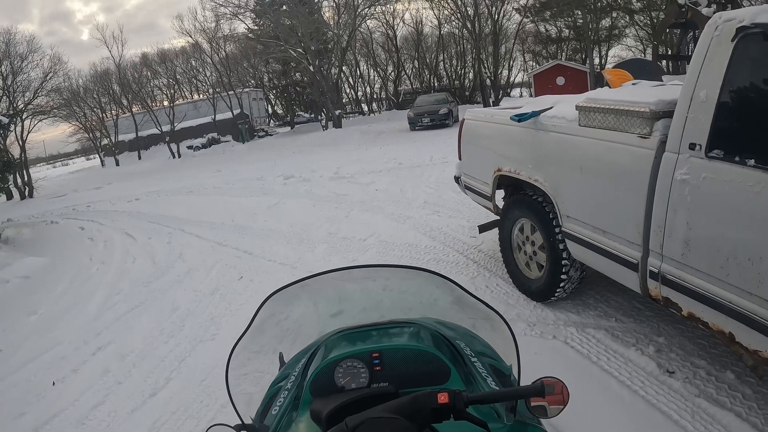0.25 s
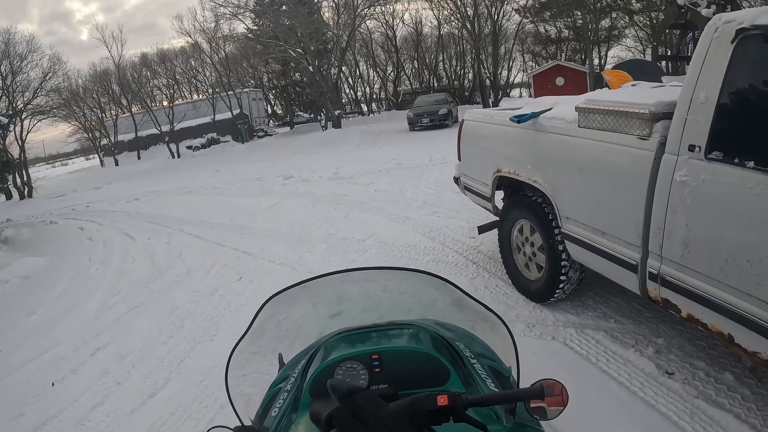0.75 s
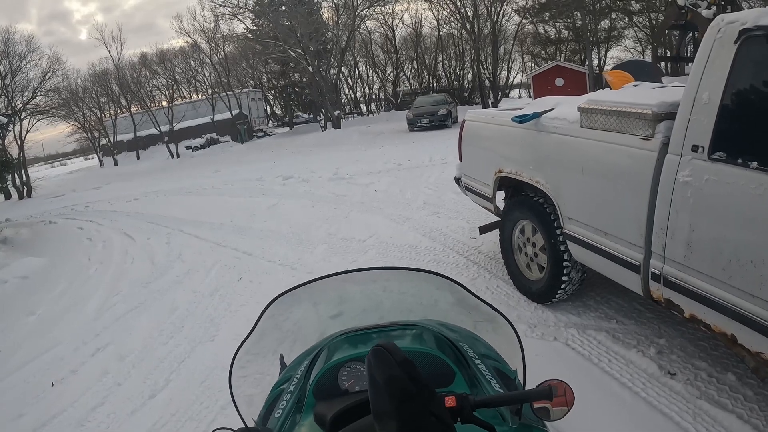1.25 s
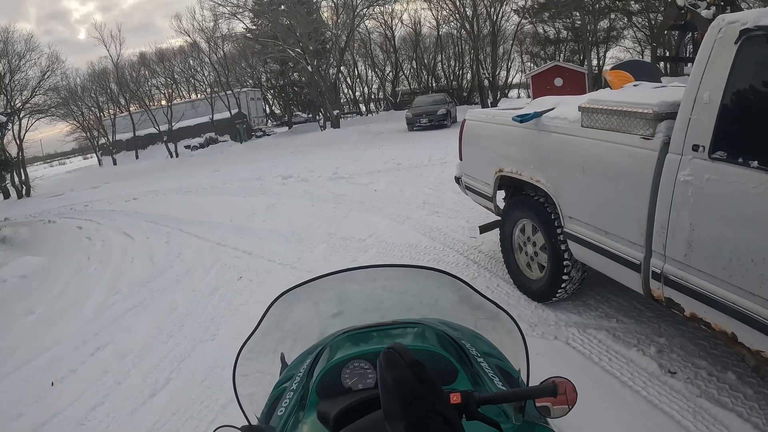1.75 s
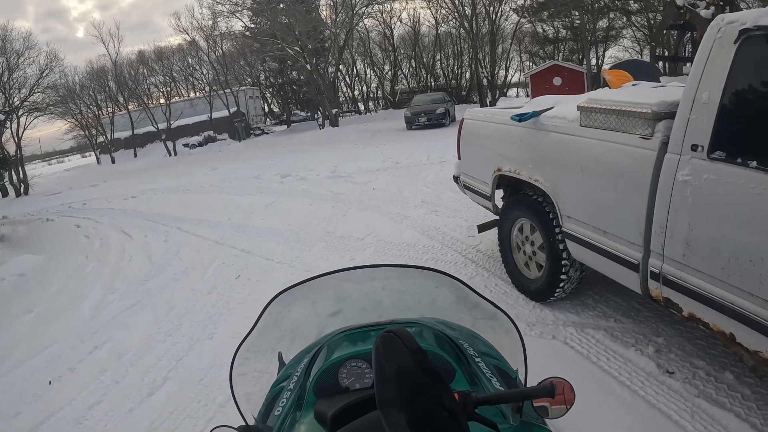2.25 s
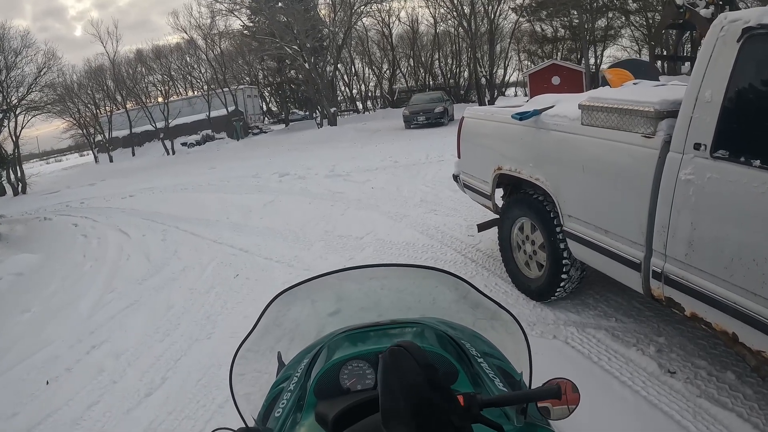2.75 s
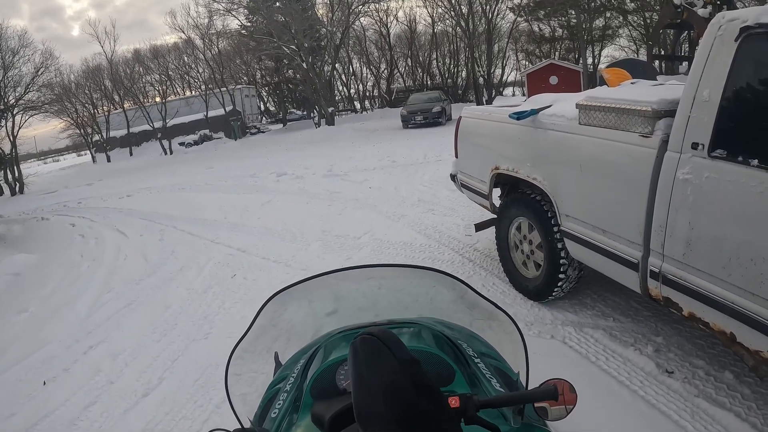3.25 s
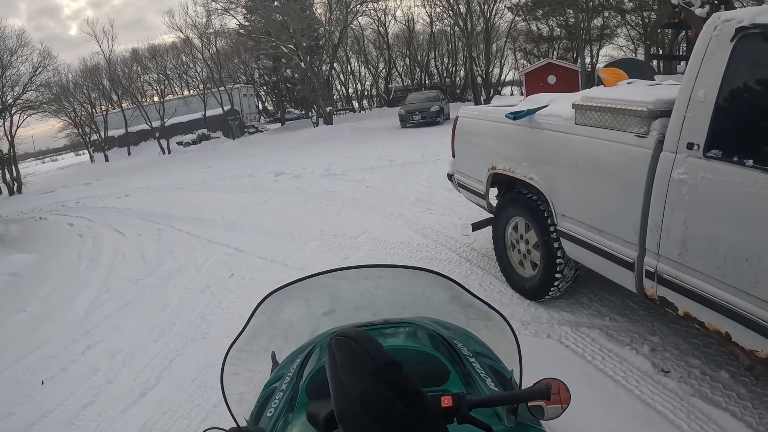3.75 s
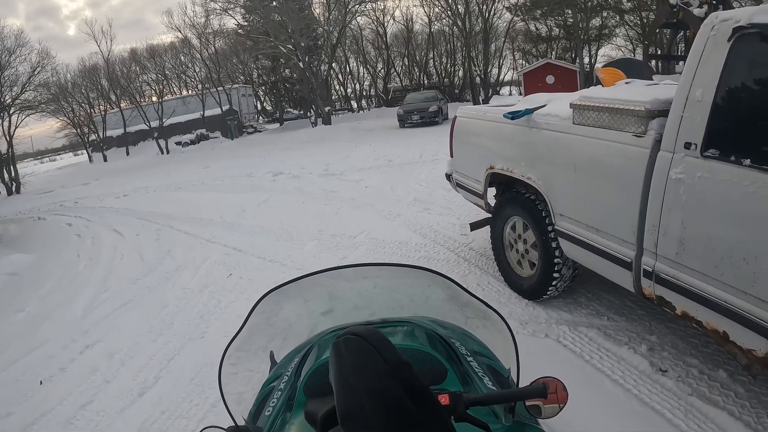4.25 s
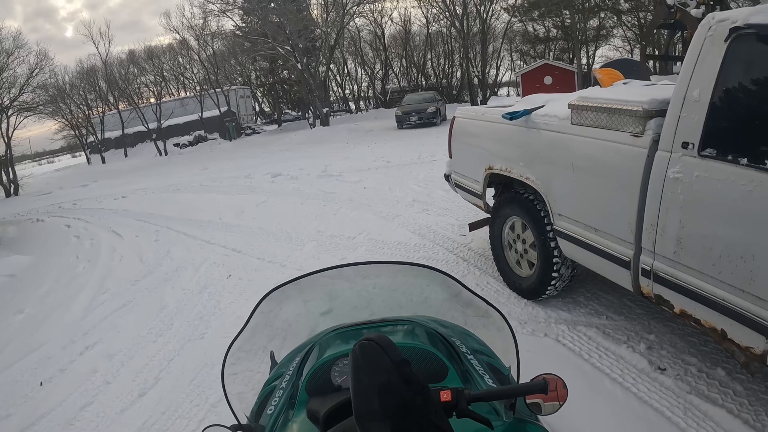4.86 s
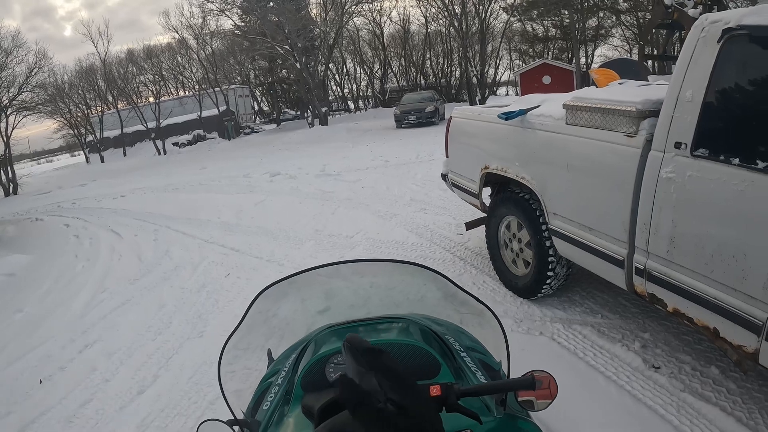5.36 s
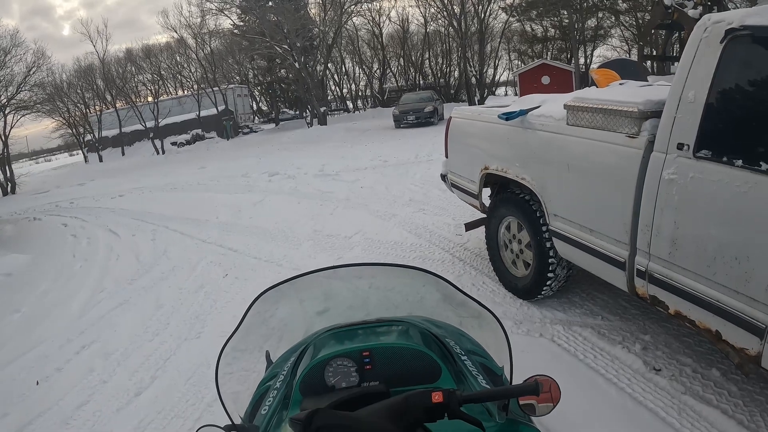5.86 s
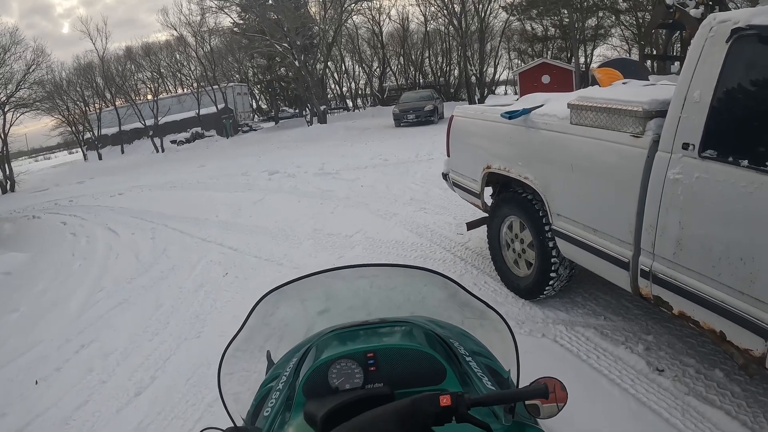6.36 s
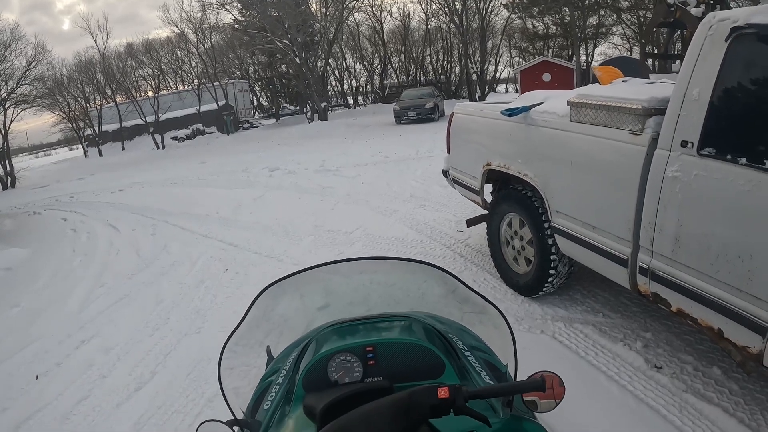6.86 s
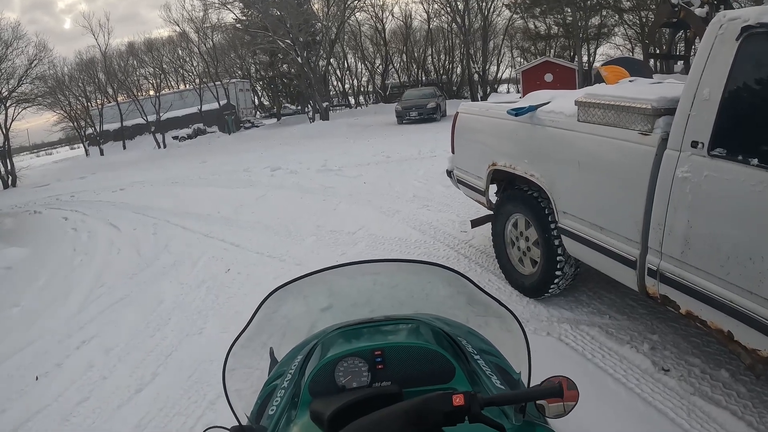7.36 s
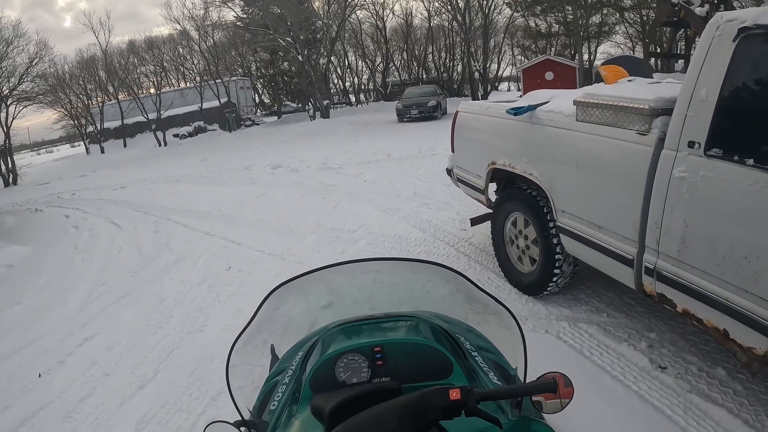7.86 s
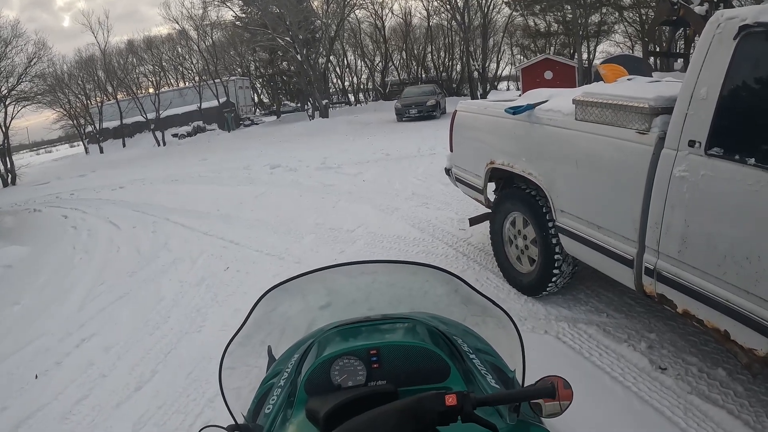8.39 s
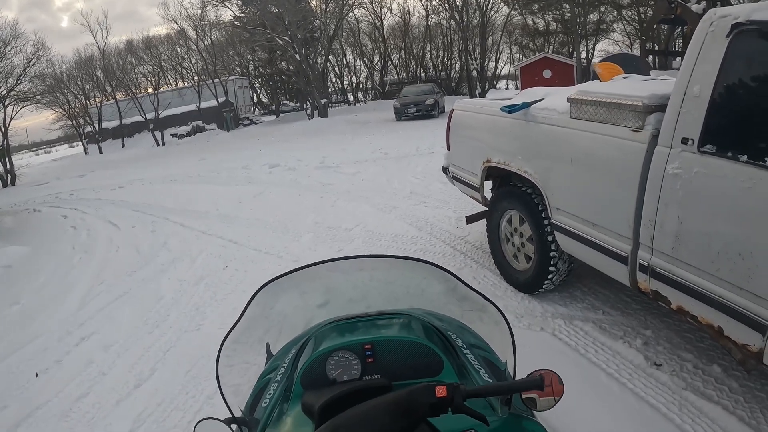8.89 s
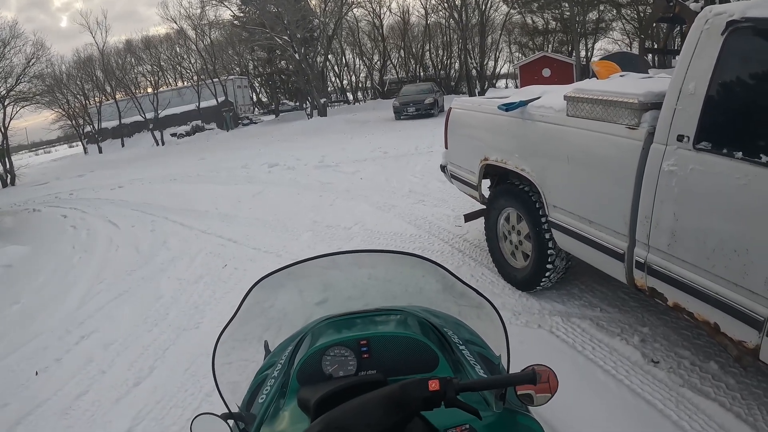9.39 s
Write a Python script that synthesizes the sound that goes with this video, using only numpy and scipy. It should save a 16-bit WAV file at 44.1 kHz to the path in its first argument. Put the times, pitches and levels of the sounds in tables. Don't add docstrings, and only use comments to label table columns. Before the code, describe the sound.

Continuous close engine idle, about forty-five strokes a second, steady in speed but ragged, with chattering metal, a faint ringing pipe and spitting hiss. Under it a truck's low exhaust boom hunts slightly, weakens around seven seconds and returns. Scattered short taps on hollow plastic and soft wind booms punctuate it. Open air, dry, nearly centred sound with slight stereo width and dulled extreme treble.

```python
import sys
import numpy as np
from scipy import signal
from scipy.fft import rfft, irfft
from scipy.io import wavfile
from scipy.ndimage import uniform_filter1d

SR = 44100
rng = np.random.default_rng(int(sys.argv[2]) if len(sys.argv) > 2 else 0)


def unload_audio(sound):
    columns = np.transpose(np.atleast_2d(sound))
    steps = np.round(np.clip(columns, -1, 1) * 32767)
    wavfile.write(sys.argv[1], SR, steps.astype(np.int16))


def undo_db(level):
    steps = np.asarray(level, float) / 20
    return 10 ** steps


N = 424683
TIME = np.arange(N) / SR
HZ = np.arange(N // 2 + 1) * SR / N + 1e-3
STROKES_PER_S = 44.8


def in_time(rows):
    s, *columns = np.transpose(rows)
    return [np.interp(TIME, s, column) for column in columns]


def at_hz(points, column=1):
    table = np.array(points)
    return np.interp(np.log(HZ), np.log(table[:, 0]), table[:, column])


def bells(rows, width_s):
    widths = np.broadcast_to(width_s, len(rows))
    return sum(height * np.exp(-((TIME - s) / w) ** 2) for (s, height), w in zip(rows, widths))


def coloured(x, gain):
    y = irfft(rfft(x) * gain, N)
    return y / np.sqrt(np.mean(y ** 2))


def drift(rate_hz):
    return coloured(rng.standard_normal(N), 1 / (1 + (HZ / rate_hz) ** 2))


def grit(spread_db):
    return rng.standard_normal(N) * undo_db(spread_db * drift(380))


def ring(x, hz, t60_s):
    r, w = undo_db(-60 / (t60_s * SR)), 2 * np.pi * hz / SR
    return signal.lfilter([0, np.sin(w)], [1, -2 * r * np.cos(w), r * r], x + 1e-18)


def orders(turns, table, wobble_db, slip, scatter):
    starts = scatter * rng.uniform(-np.pi, np.pi, len(table))
    total = np.zeros(N)
    for (multiple, db), start in zip(table, starts):
        level = np.sqrt(2) * undo_db(db + wobble_db * drift(0.69))
        total += level * np.cos(2 * np.pi * multiple * turns + start + slip * drift(4.6))
    return total


def firings():
    # start_s, thump_share, rattle_db, pipe_ring_db
    firing_rows = [(0.0393, 0.91, -46.9, -58.1), (0.1276, 1.18, -54.0, -54.3), (0.1728, 0.74, -54.9, -59.8),
                   (0.2407, 1.11, -48.7, -57.4), (0.3079, 0.73, -51.7, -57.3), (0.3981, 1.24, -48.6, -59.8),
                   (0.4878, 0.96, -56.6, -60.1), (0.5775, 0.95, -52.8, -56.6), (0.6892, 0.72, -54.0, -61.0),
                   (0.7568, 1.49, -50.2, -54.9), (0.8696, 1.09, -46.5, -52.1), (0.8921, 0.83, -50.9, -54.0),
                   (0.9365, 0.9, -51.5, -55.4), (1.0704, 1.15, -52.8, -56.3), (1.1379, 0.82, -51.1, -59.1),
                   (1.2051, 1.41, -48.0, -49.0), (1.3173, 1.03, -53.4, -65.6), (1.3395, 1.11, -50.2, -58.2),
                   (1.3836, 0.36, -50.6, -60.4), (1.4952, 1.19, -47.6, -58.2), (1.5626, 1.06, -50.9, -54.2),
                   (1.6073, 0.89, -52.5, -55.6), (1.6982, 0.76, -52.9, -57.9), (1.721, 1.12, -47.3, -52.1),
                   (1.7435, 1.31, -54.2, -52.5), (1.8783, 0.7, -54.9, -58.7), (1.9013, 0.49, -51.1, -60.2),
                   (1.924, 1.12, -50.9, -57.7), (1.969, 0.71, -60.0, -58.2), (2.0587, 1.27, -53.0, -58.8),
                   (2.0811, 0.91, -52.1, -52.0), (2.1945, 1.25, -47.6, -57.1), (2.2629, 0.96, -47.3, -53.5),
                   (2.2855, 0.7, -48.0, -45.2), (2.371, 0.88, -60.0, -58.6), (2.4158, 1.12, -55.2, -58.8),
                   (2.5068, 1.33, -49.5, -53.5), (2.5295, 1.25, -49.7, -51.8), (2.6429, 0.83, -60.0, -60.5),
                   (2.6888, 1.16, -53.3, -59.8), (2.848, 0.9, -52.6, -57.9), (2.871, 1.73, -48.7, -47.7),
                   (2.9162, 1.07, -50.7, -54.9), (3.0528, 1.0, -51.6, -62.3),
                   (3.0756, 1.06, -54.2, -51.4), (3.0984, 0.81, -60.0, -53.2), (3.1894, 1.29, -50.9, -53.1),
              (3.2575, 0.88, -53.2, -63.4), (3.28, 0.69, -60.0, -57.9), (3.3701, 0.97, -50.5, -57.5),
              (3.4153, 0.92, -58.8, -57.9), (3.5961, 1.49, -53.7, -54.5), (3.6188, 0.79, -41.9, -53.2),
              (3.7093, 1.38, -45.5, -51.0), (3.7318, 0.69, -49.5, -46.5), (3.7541, 0.05, -50.6, -51.5),
              (3.8625, 1.64, -46.4, -53.1), (3.9977, 1.05, -49.1, -56.1), (4.1765, 1.55, -49.2, -51.3),
              (4.3544, 0.71, -60.0, -54.9), (4.4437, 1.22, -51.1, -56.1), (4.5115, 1.15, -45.4, -55.7),
              (4.5339, 0.73, -49.5, -55.9), (4.6242, 1.56, -46.8, -51.7), (4.716, 1.06, -51.5, -57.7),
              (4.7386, 1.31, -50.0, -56.3), (4.761, 1.17, -53.6, -50.6), (4.8492, 0.72, -59.6, -59.2),
              (4.9404, 1.45, -50.5, -60.7), (5.0318, 0.93, -54.0, -59.2), (5.0545, 1.15, -48.7, -54.8),
              (5.0769, 1.03, -49.7, -53.9), (5.1649, 1.39, -48.5, -55.5), (5.2777, 1.1, -51.2, -59.0),
              (5.3003, 0.86, -55.9, -56.5), (5.3452, 1.11, -53.0, -56.3), (5.4347, 1.09, -54.3, -57.7),
              (5.5246, 0.71, -53.3, -56.4), (5.614, 0.69, -57.3, -60.3), (5.6586, 1.08, -49.7, -55.4),
              (5.748, 0.9, -57.3, -61.8), (5.8386, 0.82, -57.5, -61.5), (5.8841, 0.92, -51.1, -58.4),
              (5.9759, 1.79, -44.1, -53.6), (5.9985, 1.08, -47.1, -49.5), (6.0883, 1.11, -54.2, -55.3),
              (6.1107, 2.02, -42.3, -49.2), (6.1326, 0.05, -44.0, -52.3),
                   (6.2428, 1.04, -55.1, -59.3), (6.2876, 0.73, -54.2, -60.9), (6.4663, 1.53, -47.2, -49.3),
            (6.4887, 0.11, -47.4, -47.8), (6.511, 0.8, -54.6, -54.2), (6.6433, 0.83, -60.0, -59.4),
            (6.688, 0.69, -56.9, -59.0), (6.7103, 0.8, -60.0, -55.1), (6.9094, 0.72, -54.4, -62.7),
            (7.1768, 1.43, -48.0, -54.0), (7.3103, 0.93, -54.7, -56.9), (7.4429, 1.07, -49.1, -58.6),
            (7.5532, 0.93, -49.8, -62.3), (7.5755, 1.0, -51.6, -54.7), (7.6195, 1.06, -49.9, -55.1),
            (7.7537, 1.4, -48.4, -54.4), (7.7761, 1.33, -46.6, -54.5), (7.7983, 0.7, -51.5, -50.9),
            (7.8861, 1.12, -54.2, -61.1), (7.9305, 0.76, -50.4, -65.8), (7.9968, 1.23, -48.1, -61.8),
            (8.019, 0.79, -54.2, -60.2), (8.1077, 1.39, -49.2, -52.6), (8.2205, 1.41, -48.4, -59.0),
            (8.2428, 1.31, -45.6, -48.2), (8.2647, 0.05, -48.5, -52.4), (8.4172, 1.74, -48.0, -52.7),
            (8.5292, 1.01, -49.1, -59.9), (8.551, 1.03, -50.7, -50.4), (8.6829, 1.29, -47.8, -55.4),
            (8.7281, 0.98, -60.0, -58.1), (8.7731, 0.82, -60.0, -55.8), (8.818, 0.75, -58.8, -56.4),
            (8.9081, 1.41, -46.4, -52.2), (8.9305, 0.58, -47.0, -50.6), (9.0195, 0.72, -50.5, -60.9),
            (9.0865, 1.09, -50.5, -56.1), (9.1758, 1.21, -53.6, -54.2), (9.2648, 1.0, -50.6, -53.1),
            (9.354, 1.4, -47.5, -51.5), (9.3983, 0.88, -55.5, -52.0), (9.5096, 0.98, -52.0, -58.3),
            (9.5319, 0.85, -53.3, -57.7), (9.576, 0.94, -48.6, -59.2)]
    return firing_rows


def crank():
    s = np.array(firings())[:, 0]
    strokes = np.cumsum(np.round(np.diff(s, prepend=s[0]) * STROKES_PER_S))
    times = [s[0] - 1, *s, s[-1] + 1]
    return np.interp(TIME, times, [-STROKES_PER_S, *strokes, strokes[-1] + STROKES_PER_S]) / 2


def body():
    # pitch_hz, width_hz, level_db
    resonances = [(767, 67, 5), (987, 200, 4.5), (1494, 45, 6.5), (2073, 230, 5), (3070, 56, 6),
                  (3290, 31, 9.5), (4700, 230, 6), (5570, 870, -6), (6020, 66, 10.5), (10820, 700, -6.5),
                  (12000, 1600, 15)]
    return undo_db(sum(db / (1 + (2 * (HZ - hz) / width) ** 2) for hz, width, db in resonances))


def fins(depth_db, width_hz):
    bumps = uniform_filter1d(rng.standard_normal(len(HZ)), int(width_hz * N / SR))
    return undo_db(depth_db * bumps / bumps.std())


def swells(levels_db, rise, stretch):
    firing_s = .022
    out = np.zeros(N)
    t = np.arange(SR // 6) / SR / firing_s
    shape = (1 - np.exp(-t / rise)) ** 2 * np.exp(-t / stretch)
    for (s, *_), db in zip(firings(), levels_db):
        start = round((s - 0.2 * firing_s) * SR)
        out[start:][:len(t)] += undo_db(db) ** 2 * shape[:N - start]
    return np.sqrt(out)


def low_beat(turns, beat_db):
    alike = [(8, -30), (10, -30)]
    uneven = [(.5, -20), (1, -18), (3, -14), (5, -24), (9, -36)]
    even_beat = orders(turns, alike, wobble_db=1.02, slip=0.14, scatter=.1)
    uneven_beat = orders(turns, uneven, wobble_db=2.2, slip=0.33, scatter=0.86)
    return undo_db(beat_db) * (even_beat + uneven_beat)


def clatter(stroke, beat_db):
    # pitch_hz, level_db_per_hz
    colour = [(120, -31.5), (200, -5.5), (323, -16.5), (458, -12), (591, -23), (750, -16), (839, -19.5),
              (1020, -6.5), (1150, -14.5), (1470, -14.5), (1860, -23.5), (2290, -20), (3630, -38),
              (7090, -32), (9010, -49), (11700, -62.5), (19800, -120)]
    gain = undo_db(at_hz(colour)) * body() * fins(0.88, 40) / (1 + (HZ / 11600.0) ** 6)
    level_db = -39.5 + 1.1 + 0.26 * (beat_db - beat_db.mean())
    x = undo_db(level_db) * coloured(stroke * grit(0.8), gain)
    top = irfft(rfft(x) * (HZ > 3600), N)
    flutter = undo_db(1.34 * (drift(16) + 0.07))
    return x + (flutter - 1) * top


def air_box(stroke):
    gulps = stroke * undo_db(3.6 * drift(6.1)) * rng.standard_normal(N)
    return undo_db(-57.5) * coloured(ring(gulps, hz=459.4, t60_s=.12), 1)


def knock(turns):
    lag = .4
    strokes = np.diff(np.floor(2 * turns - lag), append=0).clip(0)
    strokes = strokes * undo_db(3 * rng.standard_normal(N))
    raps = np.convolve(strokes, np.hanning(220))[:N] * rng.standard_normal(N)
    return undo_db(-52) * coloured(ring(raps, hz=1032, t60_s=0.028), HZ / 1000 / (1 + (HZ / 1300) ** 4))


def puffs(clicks, delay_s, hz, half_s, db, wave):
    t = (np.arange(2400) - 1200) / SR
    shape = -undo_db(db) * np.exp(-(t / half_s) ** 2) * wave(2 * np.pi * hz * t)
    return np.roll(signal.fftconvolve(clicks, shape, "same"), round(delay_s * SR))


def exhaust(turns, beat_db):
    strokes = np.diff(np.floor(2 * turns), append=0).clip(0)
    strokes = strokes * undo_db(beat_db + 1.5 * rng.standard_normal(N))
    s, share, *_ = np.transpose(firings())
    fired = np.zeros(N)
    fired[np.round(s * SR).astype(int)] = share
    stroke_puffs = puffs(strokes, delay_s=.0103, hz=84, half_s=.0062, db=3, wave=np.sin)
    thumps = puffs(fired, delay_s=.0058, hz=100, half_s=.0085, db=-19.5, wave=np.cos)
    return stroke_puffs + thumps


def rattle(rattle_db):
    # pitch_hz, level_db_per_hz
    colour = [(1940, -23.5), (3300, -3.5), (3540, -14), (3730, -26.5), (4050, 1.5), (4410, -4.5),
              (4780, -2), (5330, -2.5), (5600, -6), (6040, -5.5), (7060, -2), (7740, -3), (8280, -14),
              (9010, -15), (11700, -39.5), (19800, -120)]
    edges_hz = [0, 4000, 5600, 7000, 8300, 10700, 30000]
    spectrum = rfft(coloured(grit(0.71), undo_db(at_hz(colour)) * body() * fins(2.8, 37)))
    loose_parts = np.zeros(N)
    for low, high in zip(edges_hz, edges_hz[1:]):
        loose_parts += undo_db(1.8 * drift(39)) * irfft(spectrum * (HZ >= low) * (HZ < high), N)
    top_db = -43.5
    return swells(np.minimum(rattle_db, top_db) + 6, 0.25, 0.55) * loose_parts


def hood(rattle_db):
    # pitch_hz, level_db_per_hz
    colour = [(350, -40.5), (600, -12.5), (851, -6), (1010, -2), (1170, -16.5), (1510, -4.5), (3080, -8.5),
              (3610, -31.5), (4000, -34.5), (5200, -61), (8800, -120)]
    shake = coloured(grit(3.3), undo_db(at_hz(colour)) * body() * fins(2.5, 44))
    return swells(1.29 * (rattle_db + 49) - 40, 0.4, 0.82) * shake


def pipe(pipe_db):
    rush = swells(1.4 * (pipe_db + 50) - 70, 0.36, 0.93) * rng.standard_normal(N)
    return ring(rush, hz=1661, t60_s=0.22)


def spit(rattle_db):
    hiss = coloured(grit(2.5), body() * (HZ > 8300) * (8300 / HZ) ** 6)
    return swells(0.94 * (rattle_db + 57) - 72, 0.24, 0.28) * hiss


def snowmobile():
    # start_s, beat_db
    beat_strength = [
        (0, -21),
        (2.5, -21),
        (3.5, -21),
        (6, -21),
        (6.3, -21),
        (6.9, -23),
        (7.6, -22),
        (8.5, -21.5),
        (9.63, -21),
    ]
    beat_db, = in_time(beat_strength)
    turns = crank()
    stroke_db = 0.4 * np.cos(4 * np.pi * turns) + 0.67 * np.cos(2 * np.pi * turns)
    stroke = undo_db(stroke_db + 1.23 * drift(12))
    s, _, rattle_db, pipe_db = np.transpose(firings())
    follows_at_once = np.diff(s, prepend=-1) * STROKES_PER_S < 1.5
    rattle_db = rattle_db - 4.5 * follows_at_once
    running = low_beat(turns, beat_db) + clatter(stroke, beat_db) + air_box(stroke)
    blows = knock(turns) + exhaust(turns, beat_db)
    return running + blows + rattle(rattle_db) + hood(rattle_db) + pipe(pipe_db) + spit(rattle_db)


def truck():
    # start_s, firings_per_s
    speed = [(0, 42.2), (.15, 42.9), (.4, 40.7), (1.0, 42.8), (1.15, 41.5), (1.5, 42.5), (1.75, 41.1),
             (2.75, 42.4), (3.1, 43.6), (3.55, 41), (4.35, 41.9), (4.55, 40.8), (5.7, 41.3), (6.0, 40.4),
             (7.55, 40.3), (8.3, 44.1), (8.65, 41.5), (9.63, 41.8)]
    # start_s, boom_loss_db
    stumbles = [(.28, 7), (.42, 3), (.88, -2), (1.18, 2), (1.65, 7), (2.12, 4), (2.29, -3), (2.37, 3),
                (2.52, -2), (2.8, 3), (2.95, -2), (3.49, 6), (3.99, 4), (4.08, -2), (4.18, 4), (4.48, 5),
                (4.6, 3), (4.98, 4), (5.25, 3), (5.42, 11.5), (5.7, -2.5), (6.17, 7), (6.31, -3), (6.57, 5),
                (6.97, 6), (7.25, -3.5), (7.78, -3), (8.85, 5), (9.04, -3), (9.44, 5.5)]
    # start_s, level_db
    boom_strength = [
        (0, -28.5),
        (1.5, -28.5),
        (3.0, -29),
        (4.3, -28),
        (6.35, -29.5),
        (6.6, -33.5),
        (7.1, -35),
        (7.8, -28),
        (8.3, -31.5),
        (9.63, -28.5),
    ]
    # multiple_of_firing, level_db
    weaker = [(2, -43), (3, -34), (4.5, -54.5), (5, -45.5), (5.5, -54.5), (6, -48), (6.5, -63), (7, -50.5),
              (8, -58.5), (11, -56)]
    # pitch_hz, level_db_per_hz
    rumble_colour = [(15, -29.5), (25, -6.5), (81, 1), (129, 8.5), (157, -1), (186, 3.5), (215, -23.5),
                     (300, -31), (390, -58), (660, -120)]
    rate, = in_time(speed)
    loss_db = bells(stumbles, .045)
    boom_db = in_time(boom_strength)[0] + 1.93 * (rate - rate.mean()) - loss_db
    fired = np.cumsum(rate - .25 * loss_db) / SR
    boom = undo_db(boom_db) * orders(fired, [(4, 0.021)], wobble_db=0.1, slip=0.27, scatter=0.1)
    effort = undo_db(0.42 * (uniform_filter1d(boom_db, 8000) + 24))
    rumble = undo_db(-39) * coloured(rng.standard_normal(N), undo_db(at_hz(rumble_colour)) * (HZ < 400))
    return boom + effort * (orders(fired, weaker, wobble_db=2.0, slip=0.2, scatter=0.1) + rumble)


def wind():
    # start_s, boom_db, length_s
    gust_rows = [(0, -28.5, 0.098), (0.504, -36, 0.067), (.9, -38, 0.052), (1.15, -39, 0.077),
                 (3.2, -38, 0.17), (3.92, -32.5, 0.11), (5.923, -33, 0.13), (6.588, -15.5, .05),
                 (6.697, -19.5, 0.066), (7.554, -27, 0.046), (8.014, -31.5, 0.066), (8.414, -36, 0.057),
                 (8.694, -26, 0.15), (9.315, -33, 0.078)]
    flutter = coloured(rng.standard_normal(N), (HZ / 8) ** 2 / (1 + (HZ / 12) ** 4))
    boom = coloured(rng.standard_normal(N), 1 / (1 + ((HZ - 54) / 5) ** 2))
    boom_level = np.sqrt(uniform_filter1d(boom ** 2, 3000) + .05)
    breeze = undo_db(-35.5)
    gusts = breeze + bells([(s, undo_db(db)) for s, db, _ in gust_rows], [row[2] for row in gust_rows])
    return undo_db(-28 + 2.2 * drift(1.5)) * flutter + gusts * boom / boom_level


def filtered(x, order, hz, kind):
    return signal.sosfilt(signal.butter(order, hz, kind, fs=SR, output="sos"), x)


def struck(hit, modes, uneven_db):
    x = sum(undo_db(db + uneven_db * rng.standard_normal()) * ring(hit, hz, t60) for hz, db, t60 in modes)
    return x / abs(x).max()


def glove():
    # low_ring_db, bright_ring_db, top_db
    taps = [(0.883, -26, -11, -5, -24.5), (1.132, -31, -7, -18.5, -31), (2.746, -26.5, -20, -12, -27),
            (3.5655, -24, -14, -18, -20.5), (3.6255, -12.5, -10.5, -14.5, -23), (3.943, -27, -20, -18, -17),
            (4.317, -28, -10, -14, -20.5), (4.443, -37, -13, -11, -13), (6.368, -31, -22, -14, -33),
            (7.592, -20.5, -33.5, -10, -36), (8.257, -29, -25, -9, -22), (9.167, -26.5, -30, -7.5, -34)]
    # pitch_hz, level_db, t60_s
    main_modes = [(814, -4.5, 0.015), (1080, 1, 0.02), (1210, 4, 0.012), (1400, 2, 0.01)]
    low_modes = [(454, -5, 0.046), (636, 0, 0.0063)]
    bright_modes = [(1510, -4.5, 0.016), (1816, 4.5, 0.03), (2310, 1, 0.034), (2670, -2, 0.019),
                    (2950, -2, 0.012)]
    top_modes = [(3400, -9, 0.015), (3960, -2, .015), (4950, 1, .015), (6650, -0.5, .008)]
    # low_hz, high_hz
    crack_band_hz = [800, 3600]
    out = np.zeros(N)
    for s, db, low_db, bright_db, top_db in taps:
        hit = np.zeros(3000)
        hit[[0, *rng.integers(20, 170, 4)]] = 0.38, 0.68, -0.73, 1.0, -1.3
        hit = np.convolve(hit, np.hanning(7))[:3000]
        hit = filtered(hit, 3, 380, "high")
        parts = [(main_modes, -3), (low_modes, low_db + 3), (bright_modes, bright_db + 6),
                 (top_modes, top_db + 3)]
        tap = sum(undo_db(db + part_db) * struck(hit, modes, 3.1) for modes, part_db in parts)
        crack = rng.standard_normal(3000) * np.exp(-TIME[:3000] / .002)
        crack = filtered(crack, 2, crack_band_hz, "band")
        tap = tap + undo_db(db + 0.51 * top_db + 0.5) * crack
        start = round(s * SR)
        out[start:start + 3000] += tap
    return filtered(out + 1e-18, 6, 410, "high")


def scene():
    # pitch_hz, in_step_share, quarter_cycle_share, unrelated_share
    ports = [(100, 0, 0, .012), (250, 0, 0, .03), (420, .07, .15, .14), (700, .13, .13, .14),
             (830, .2, .3, .25), (1050, .3, 0, .14), (1350, -.17, -.2, .36), (1550, .2, -.7, .5),
             (1650, .8, .3, 1.1), (1850, .7, -.1, .9), (2050, .2, -.15, .2), (2600, -.05, -.45, .37),
             (3700, -.1, -.5, .85), (4700, 0, 0, .045), (8300, 0, 0, .05), (9400, 0, 0, .65),
             (11000, 0, 0, .3), (13500, 0, 0, .8)]
    common = snowmobile() + truck() + wind() + glove()
    spectrum = rfft(common)
    steered = irfft(spectrum * (at_hz(ports, column=1) + 1j * at_hz(ports, column=2)), N)
    scattered = irfft(spectrum * at_hz(ports, column=3), N) * drift(40)
    return common + (steered + scattered) * np.array([[1], [-1]])


def top_cut(x):
    return signal.sosfilt(signal.butter(12, 14300, fs=SR, output="sos"), x)


def record(dry):
    peak = .55
    mix = peak * np.tanh(dry / peak)
    return top_cut(mix)


dry = scene()
out = record(dry)
unload_audio(out)
```